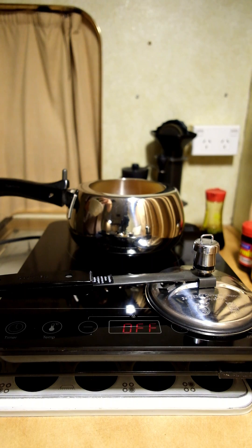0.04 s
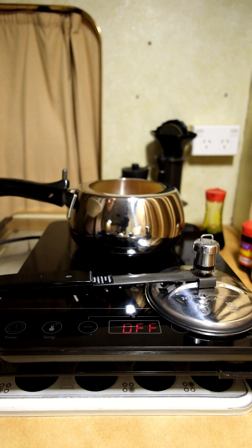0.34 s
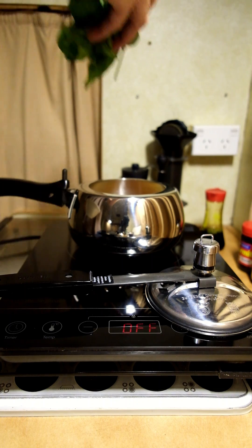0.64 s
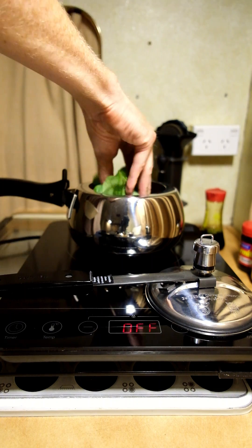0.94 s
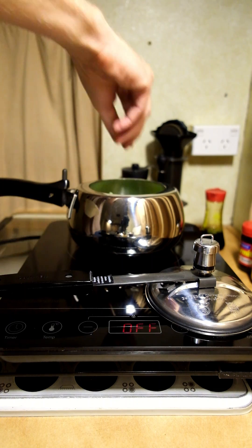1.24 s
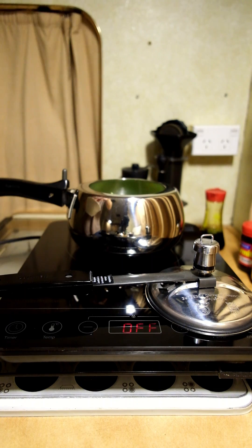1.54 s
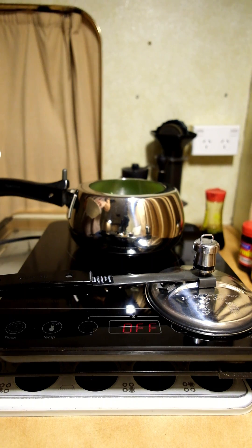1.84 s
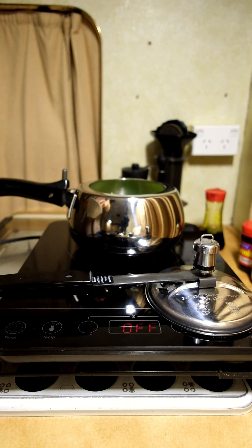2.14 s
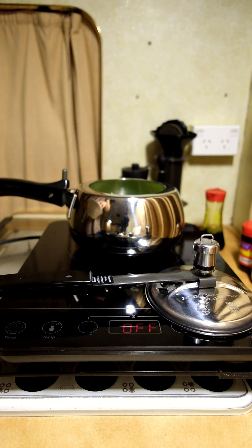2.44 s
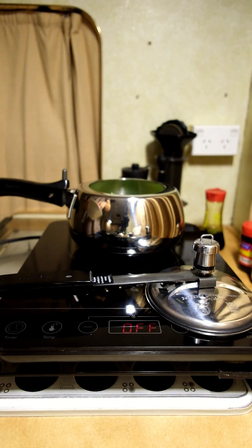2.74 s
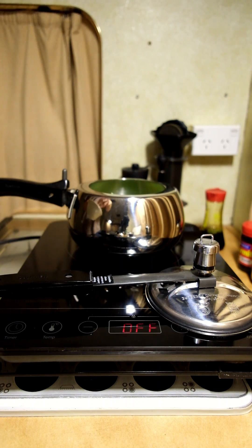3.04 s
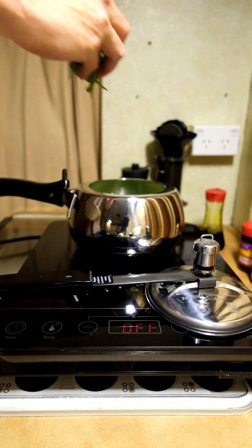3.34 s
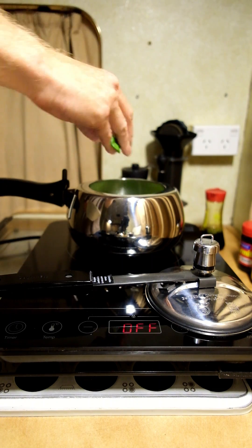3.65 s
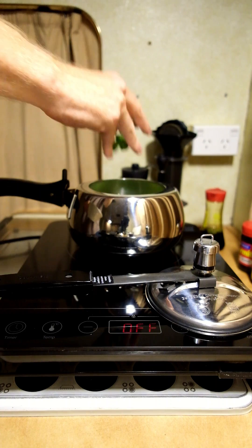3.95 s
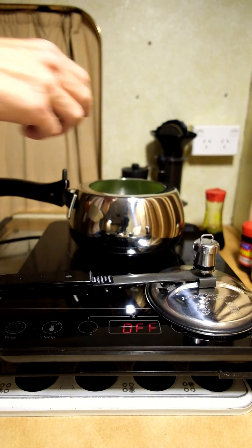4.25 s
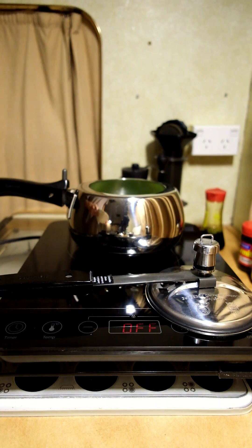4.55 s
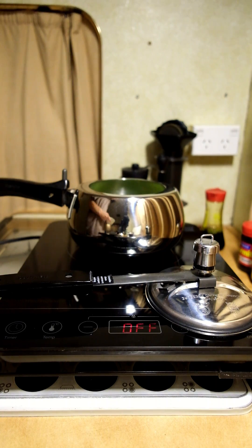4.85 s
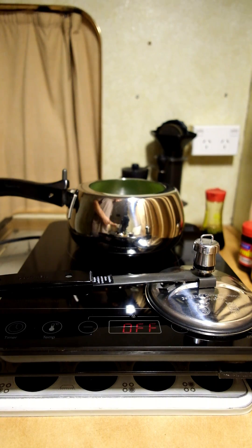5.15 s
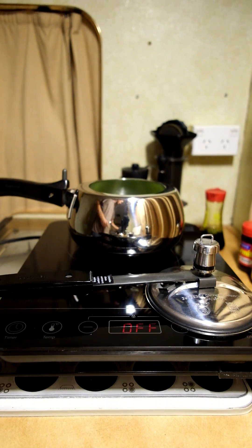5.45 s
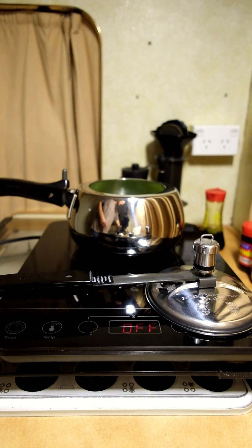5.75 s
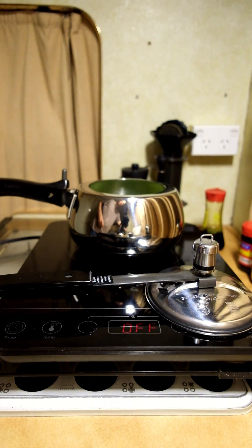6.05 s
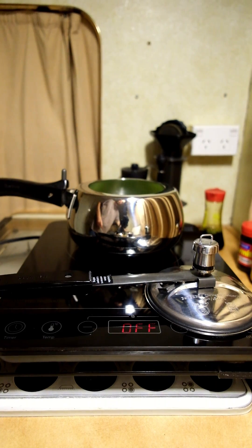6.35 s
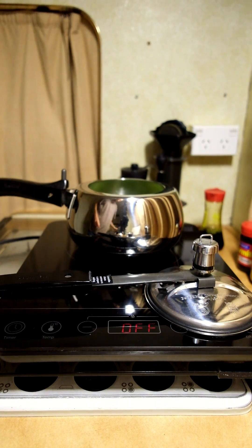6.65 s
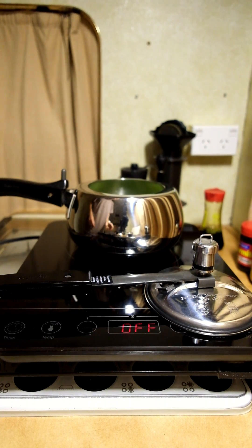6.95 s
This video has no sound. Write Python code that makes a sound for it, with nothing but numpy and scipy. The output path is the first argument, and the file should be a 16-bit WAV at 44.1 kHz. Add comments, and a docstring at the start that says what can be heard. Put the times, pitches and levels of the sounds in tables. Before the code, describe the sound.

Faint room tone of a small kitchen runs throughout. After a few tiny ticks, leaves rustle and a handful drops into a steel pot at about 1 second, with soft, hollow slaps. From 1.6 to 3 seconds more leaves are gathered by hand: quiet rustling and crinkling, tiny wet squeaks and crisp snapping stalks. A second handful lands at about 3.5 seconds, a few more snaps follow, and a smaller one lands just after 4 seconds. A faint tap on steel comes at 4.9 seconds, then a soft floor bump. At 5.9 seconds something heavy knocks the worktop beside the microphone, by far the loudest sound, then clatters and judders along it, stopping with a short low groan at about 6.3 seconds. A steel lid rings on faintly, and two soft floor bumps come near 6.7 and 6.9 seconds.

```python
"""Spinach is picked up by the handful and dropped into a steel pot in a small kitchen. Leaves rustle
and squeak as they rub, stalks snap, and each landing stirs the hollow air of the pot. Then something
heavy, perhaps a board, is knocked and shoved in stick-slip along the worktop beside the microphone,
and the steel lid lying on the hob rings on. Behind: a tap on steel, floor bumps, faint room tone."""
import sys
import numpy as np
from scipy import signal
from scipy.fft import rfft, irfft
from scipy.io import wavfile

SR = 44100
rng = np.random.default_rng(int(sys.argv[2]) if len(sys.argv) > 2 else 0)


def generate_wav(sig):
    """Save sig (samples, or channels by samples) to the path in sys.argv[1] as 16-bit PCM at SR."""
    pcm = np.round(np.clip(np.atleast_2d(sig).T, -1, 1) * 32767).astype(np.int16)
    wavfile.write(sys.argv[1], SR, pcm)


N = 308700
T = np.arange(N) / SR

# Spectra. Each row: frequency in Hz, relative density in dB.
ROOM_SPECTRUM = [(13, -43), (22, -10), (64, -4.5), (110, -8.5), (175, -18.5), (240, -10), (342, -19.5),
                 (426, -15), (475, -19.5), (698, -19), (869, -20.5), (1350, -19.5), (1600, -23.5),
                 (2600, -27), (4630, -31.5), (15500, -39.5)]
CRACK_SPECTRUM = [(80, -21), (200, -1), (330, 8.5), (500, -1), (850, 0.5), (1200, 7), (1550, 0),
                  (2000, -7.5), (3600, -5.5), (5000, -10), (7800, -16.5), (9400, -20.5), (11200, -42),
                  (15000, -37.5)]
JUDDER_SPECTRUM = [(29, -55), (50, -49.5), (134, 1.5), (216, -5.5), (339, 4), (381, -7.5), (670, -4),
                   (883, -4), (977, -34.5), (1270, -20), (1600, -39.5), (2080, -71)]
GRIT_SPECTRUM = [(590, -44), (1000, -6.5), (1260, 0), (1490, -5.5), (1820, -3.5), (1970, -9.5),
                 (2450, -8.5), (3530, -13.5), (9250, -27.5), (14600, -55), (15500, -83)]
LANDING_SPECTRUM = [(180, -26), (300, -14), (685, -4.5), (821, -20.5), (1220, -1.5), (1620, -11.5),
                    (1910, -5.5), (7750, -12), (15500, -20)]
TEAR_SPECTRUM = [(400, -18), (1500, 1.5), (3000, 3.5), (5500, 9), (9000, 2), (15000, -12.5)]
RUSTLE_SPECTRUM = [(240, -40), (400, -6), (796, -21), (928, -9.5), (1660, -24.5), (1820, 3.5), (2190, -7),
                   (2550, 4.5), (3250, -1.5), (5150, 6), (9000, 0.5), (15500, -14)]
# Stereo width of the room tone. Each row: frequency in Hz, side over mid in dB.
ROOM_SIDE_GAIN = [(50, -0.5), (130, 0), (300, -4.5), (1300, -3), (3000, 0.5), (15000, -0.5)]

# Resonances. Each row: frequency in Hz, relative level in dB, t60 in seconds.
FLOOR_MODES = [(118, 3.4, 0.16), (66, 4.7, 0.051)]
STEEL_MODES = [(806, -3.5, 0.11), (1786, 0, 0.049), (3050, 7, 0.017), (4270, -5, 0.02), (4620, -7, 0.035),
               (6255, -3.5, 0.043), (8030, -9, .025)]
WORKTOP_MODES = [(138.2, -29, 0.4), (176.5, -6.5, 0.031), (221.3, 1, 0.038), (322, -25.5, 0.08),
                 (410, -34.5, 0.021), (495, -25, 0.078), (530, -22, 0.13), (760, -19.5, 0.055),
                 (770, -21, 0.081), (895, -17, 0.092), (1210, -10.5, .022), (1446, -22.5, 0.06),
                 (1690, -21.5, 0.06), (2440, -24, 0.038), (2990, -22, 0.03), (5790, -15, 0.076)]
BOARD_MODES = [(344, 5, 0.04), (396, -1, 0.045), (586, -4.5, 0.16), (666, -4, 0.13), (760, -14.5, 0.2),
               (920, -13, 0.063), (1200, -8, 0.044), (1414, -17.5, 0.039)]
LID_MODES = [(134.6, 2, 0.99), (339, -6.5, 1), (504, -4.5, 0.6), (807, -5.5, 0.96), (1800, -3, 0.85)]
POT_AIR_MODES = [(571, -1.5, 0.11), (675, -4, 0.083), (1205, 6, 0.07), (1250, -1, 0.11), (1430, -19, 0.018),
                 (1960, -17, 0.016), (2500, 1, 0.011), (3910, 1, 0.022)]

# Small knocks. Each row: start in seconds, level in dB.
FLOOR_BUMPS = [(5.101, -48.5), (6.703, -51.5), (6.938, -43.5)]
STEEL_TAPS = [(4.9055, -44.5), (4.9205, -57)]
# Each row: start in seconds, thud level in dB, contact time in ms, crack trim in dB, board clack in dB.
WORKTOP_BLOWS = [(0.101, -60, .5, 19, -75), (5.899, -0.5, 0.31, -1, -36), (5.903, -14.5, 0.74, -3.5, -38.5),
                 (5.9676, -16, 0.7, -2.5, -50), (5.995, -20.5, 1.1, -3, -54), (6.044, -15, 0.66, -13, -19),
                 (6.054, -21, 0.57, -8, -27), (6.084, -14.5, 0.55, -7, -47), (6.107, -18, 0.6, -19, -48),
                 (6.13, -23, 0.7, -12, -39), (6.169, -31.5, .4, 8, -31), (6.236, -33, 0.81, -10, -53),
                 (6.934, -64, 1.3, 18, -80)]
# A nudge, then the push. Each row: start in seconds, length in seconds, judder in dB, grit in dB.
WORKTOP_SHOVES = [(5.941, 0.16, -34, -41), (6.069, 0.19, -31, -37.5)]
# Handfuls sliding into the pot. Each row: thickest moment in seconds, brush in dB, pot air in dB,
# build-up t60 in seconds, settling t60 in seconds.
HANDFUL_LANDINGS = [(1.011, -45.5, -56, 0.46, 0.38), (3.556, -51, -52, 0.14, 0.2),
                    (4.08, -56, -61, 0.045, 0.16)]
# Each row: start in seconds, smack in dB, pot air in dB, pot pitch in Hz (moves with hand and heap).
LEAF_SLAPS = [(0.934, -47, -41, 1484), (1, -41, -41, 1260), (1.03, -39.5, -41.5, 1150),
              (1.052, -51, -45, 1220), (1.094, -47, -46.5, 1254), (3.54, -43, -42, 1240),
              (3.547, -42, -50, 1155), (3.565, -41.5, -40, 1223), (3.573, -44, -42.5, 1205),
              (4.064, -44.5, -42.5, 1197), (4.081, -52, -44.5, 1178)]
# Stalks snapping, leaves flicking. Each row: start in seconds, level in dB, tick pitch in Hz.
STALK_SNAPS = [(0.167, -49, 3080), (0.267, -47, 5000), (1.031, -32, 6900), (1.623, -38.5, 4500),
               (1.867, -35, 6960), (1.889, -35, 6960), (1.9315, -27, 3580), (2.108, -42.5, 4670),
               (2.167, -48, 4000), (2.261, -42, 6010), (2.372, -57, 2600), (2.512, -34, 2300),
               (2.5418, -29, 6000), (2.636, -50, 4000), (2.71, -40, 4260), (2.738, -43, 4960),
               (2.8436, -25, 6060), (2.88, -35, 4500), (2.9132, -23, 4400), (2.941, -33.5, 4000),
               (3.377, -43.5, 4840), (3.454, -35.5, 4200), (3.7275, -28, 7200), (3.738, -50, 6050),
               (3.763, -36, 8500), (3.84, -42, 7600), (3.886, -38, 6600), (3.903, -39.5, 7600),
               (4.064, -58, 4370)]
# Each row: start in seconds, level in dB, starting pitch in Hz, t60 in seconds.
LEAF_SQUEAKS = [(0.103, -62, 5640, 0.021), (0.905, -48, 2390, 0.037), (1.621, -46.5, 2900, 0.031),
                (1.655, -52, 5260, 0.13), (1.772, -34.5, 5620, 0.018), (1.839, -39, 3000, 0.018),
                (1.9318, -27, 2780, 0.0095), (1.948, -40.5, 2510, 0.036), (1.993, -50, 2450, 0.084),
                (2.264, -46.5, 5560, .03), (2.371, -41, 2540, 0.014), (2.395, -47, 2210, 0.022),
                (2.51, -35.5, 2230, 0.02), (2.595, -42, 2620, 0.044), (3.535, -44.5, 4130, 0.033),
                (3.7265, -38, 2180, 0.015)]
# The hand closes and eases off. Each row: tightest moment in seconds, rustle in dB, crinkle in dB,
# build-up t60 in seconds, release t60 in seconds.
HAND_GRIPS = [(0.11, -102, -82, 1, 5.1), (0.92, -56.5, -63, 0.09, 0.33), (1.645, -58, -87, 0.31, 0.27),
              (1.884, -52, -52, 0.8, 0.76), (2.28, -64.5, -54.5, 0.24, 0.36),
              (2.565, -54.5, -55, 0.44, 0.54), (2.74, -69, -62.5, 0.56, 0.43),
              (2.892, -46.5, -74, 0.37, 0.16), (2.942, -46.5, -73, 0.19, 0.038),
              (3.449, -46.5, -79, 0.077, 0.12), (3.91, -56, -68, 0.18, 0.11)]


def undb(db):
    """Decibels to gain."""
    return 10 ** (np.asarray(db) / 20)


def unit_rms(x):
    """Scale to rms 1."""
    return x / np.sqrt(np.mean(x ** 2))


def unit_peak(x):
    """Scale to peak 1."""
    return x / np.abs(x).max()


def add(track, start_s, sound):
    """Mix a sound into a track."""
    i = int(start_s * SR)
    track[i:i + len(sound)] += sound[:N - i]


def through(x, response):
    """Convolve, keeping the length."""
    return signal.fftconvolve(x, response)[:len(x)]


def band(x, hz, kind, order=2):
    """Butterworth low-pass or high-pass."""
    return signal.sosfilt(signal.butter(order, hz, kind, fs=SR, output="sos"), x)


def colour(x, spectrum, size=8192):
    """Minimum-phase filter of unit power through (Hz, dB) points."""
    hz, db = np.transpose(spectrum)
    bins_hz = np.maximum(np.fft.rfftfreq(size, 1 / SR), 1)
    cepstrum = irfft(np.log(undb(np.interp(np.log(bins_hz), np.log(hz), db))))
    cepstrum[1:size // 2] *= 2
    cepstrum[size // 2 + 1:] = 0
    response = irfft(np.exp(rfft(cepstrum)))
    return through(x, response / np.linalg.norm(response))


def fade(t60_s):
    """One second of exponential decay."""
    return undb(-60 * T[:SR] / t60_s)


def swell(peak_s, rise_t60_s, fall_t60_s):
    """Exponential rise to 1, then exponential fall."""
    return undb(-60 * np.maximum((peak_s - T) / rise_t60_s, (T - peak_s) / fall_t60_s))


def stroke(start_s, length_s, attack_s, release_t60_s):
    """Linear attack, hold, exponential release."""
    release = undb(-60 * np.maximum(T - start_s - length_s, 0) / release_t60_s)
    return np.clip((T - start_s) / attack_s, 0, 1) * release


def ring(modes):
    """Impulse response of damped modes."""
    return sum(undb(db) * fade(t60_s) * np.sin(2 * np.pi * hz * T[:SR]) for hz, db, t60_s in modes)


def walk(rate_hz):
    """Random wander, spread near 1."""
    steps = rng.standard_normal(N // 50)
    return np.interp(T * rate_hz, np.arange(len(steps)), steps)


def grains(per_s, spread_db=0.0):
    """Tiny random slips of unequal size; rms 1."""
    size = undb(spread_db * np.minimum(rng.exponential(size=N), 4))
    return unit_rms((rng.random(N) < per_s / SR) * size * rng.standard_normal(N))


def place(x, left_lag_ms, wet_db, t60_s, wet_bass_db=0.0, pan_left_db=0.0):
    """Stereo direct sound plus wall echoes, which the channels share in the bass only."""
    bins_hz, crossover_hz = np.fft.rfftfreq(N, 1 / SR), 604
    echo_spectrum = [(300, wet_bass_db), (1300, wet_bass_db / 2), (4000, 0.022)]
    shared = band(rng.standard_normal(SR), crossover_hz, "low", order=1)
    channels = []
    for side in (1, -1):
        delay_s = side * left_lag_ms / 2000
        direct = irfft(rfft(x) * np.exp(-2j * np.pi * bins_hz * delay_s), N)
        echoes = shared + band(rng.standard_normal(SR), crossover_hz, "high", order=1)
        walls = colour(echoes, echo_spectrum) * fade(t60_s) * (T[:SR] > 0.002)
        wet = undb(wet_db) * through(x, walls / np.linalg.norm(walls))
        channels.append(undb(side * pan_left_db / 2) * (direct + wet))
    return np.array(channels)


def room_tone():
    """Faint rumble and hiss, wavering slightly."""
    mid = colour(rng.standard_normal(N), ROOM_SPECTRUM) * undb(0.5 * walk(rate_hz=0.38))
    hz, db = np.transpose(ROOM_SIDE_GAIN)
    width = undb(np.interp(np.fft.rfftfreq(N, 1 / SR), hz, db))
    side = irfft(rfft(colour(rng.standard_normal(N), ROOM_SPECTRUM)) * width, N)
    return undb(-60.5) * np.array([mid + side, mid - side])


def small_knocks():
    """Light taps ring the steel; soft bumps ring the floorboards."""
    out, soft_onset = np.zeros(N), 1 - fade(0.011)
    for events, modes in ((STEEL_TAPS, STEEL_MODES), (FLOOR_BUMPS, FLOOR_MODES)):
        for start_s, db in events:
            add(out, start_s, undb(db) * ring(modes) * soft_onset)
    return place(out, left_lag_ms=-0.042, wet_db=-6.0, t60_s=0.13, wet_bass_db=-18)


def lid(shaking):
    """Each mode of lid and hob stores the shaking's energy and releases it slowly."""
    out = 0
    for hz, db, t60_s in LID_MODES:
        memory = fade(t60_s) ** 2
        energy = np.abs(through(shaking ** 2, memory / memory.sum()))
        out += undb(db) * np.sqrt(energy) * np.sin(2 * np.pi * hz * T)
    return out


def blows():
    """A force pulse thuds the worktop, duller for longer contact, with a crack and a board clack."""
    out, body, clack = np.zeros(N), ring(WORKTOP_MODES), ring(BOARD_MODES)
    for start_s, db, contact_ms, crack_trim_db, clack_db in WORKTOP_BLOWS:
        progress = 1000 * T[:SR] / contact_ms
        force = progress * np.exp(-6 * progress)
        thud = through(body, force / force.sum())
        burst = rng.standard_normal(SR) * (fade(0.017) + undb(-13.5) * fade(0.12))
        crack = undb(crack_trim_db - 5.5) * colour(burst, CRACK_SPECTRUM)
        add(out, start_s, undb(db) * (crack - thud) - undb(clack_db) * clack)
    return out


def groan():
    """As the push slows, the slips lock into a low, slightly rising tone."""
    start_s, length_s, base_hz, rise_hz_per_s = 6.215, 0.036, 160.6, 330
    glide_hz = base_hz + rise_hz_per_s * np.clip(T - start_s, 0, length_s)
    pitch_hz = glide_hz * (1 + 0.03 * walk(rate_hz=110))
    envelope = stroke(start_s, length_s, attack_s=0.029, release_t60_s=0.2)
    return undb(-25) * envelope * np.sin(2 * np.pi * np.cumsum(pitch_hz) / SR)


def shove(low_cut_hz):
    """The heavy thing judders in uneven slips over hissing grit and groans to a stop."""
    judder_gain, grit_gain = 0, 0
    for start_s, length_s, judder_db, grit_db in WORKTOP_SHOVES:
        speed = stroke(start_s, length_s, attack_s=0.037, release_t60_s=0.16)
        slid_s = np.clip(T - start_s, 0, length_s)
        judder_gain += speed * undb(judder_db - 0.5 * slid_s)  # holds steady while sliding
        grit_gain += speed * undb(grit_db)
    judder = unit_rms(colour(grains(per_s=2200), JUDDER_SPECTRUM)) * judder_gain
    judder *= undb(2.0 * walk(rate_hz=55) + 1.0)
    grit = unit_rms(colour(grains(per_s=11000), GRIT_SPECTRUM)) * grit_gain
    return band(judder, low_cut_hz, "high") + groan() + grit


def worktop():
    """The worktop radiates blows and scraping with little deep bass; its shaking rings the lid."""
    low_cut_hz = 72
    knocks = band(blows(), low_cut_hz, "high", order=4)
    scrape = shove(low_cut_hz)
    ringing = undb(-23.0) * lid(undb(-7.5) * knocks + scrape)
    struck = place(knocks, left_lag_ms=0.1, wet_db=-3, t60_s=0.03, wet_bass_db=-14, pan_left_db=-0.5)
    slid = place(scrape, left_lag_ms=0.081, wet_db=2, t60_s=0.074, wet_bass_db=-10.5, pan_left_db=-1)
    return struck + ringing + slid


def slaps():
    """Leaves smack down on each other and ring the air in the pot."""
    out, open_pot_hz = np.zeros(N), 1218  # pitch with no hand in the way
    for start_s, smack_db, air_db, pot_hz in LEAF_SLAPS:
        smack = colour(rng.standard_normal(SR) * fade(0.055), LANDING_SPECTRUM)
        plop = ring(np.array(POT_AIR_MODES) * [pot_hz / open_pot_hz, 1, 1])
        add(out, start_s, undb(air_db) * unit_peak(plop) + undb(smack_db) * unit_peak(smack))
    return out


def landings():
    """Falling leaves brush the steel, slap down and stir the pot's air, which the heap damps."""
    brush_gain, air_gain = 0, 0
    for peak_s, brush_db, air_db, build_s, settle_s in HANDFUL_LANDINGS:
        falling = swell(peak_s, build_s, settle_s)
        brush_gain += undb(brush_db) * falling
        air_gain += undb(air_db) * falling
    brush = colour(grains(per_s=6000, spread_db=2.7), LANDING_SPECTRUM) * brush_gain
    leaves = brush + slaps()
    hollow = ring(POT_AIR_MODES)
    air = through(grains(per_s=2800) * air_gain, hollow / np.linalg.norm(hollow))
    return place(leaves + air, left_lag_ms=-0.034, wet_db=-4, t60_s=0.014,
                 wet_bass_db=1.5, pan_left_db=0.5)


def squeak(start_hz, t60_s):
    """Stick-slip tone that wobbles and climbs as the wet leaf speeds up."""
    t, rise, wobble, attack_s = T[:SR], 0.305, 0.054, 0.0014
    pitch_hz = start_hz * (1 + rise * np.minimum(t / t60_s, 1) + wobble * walk(rate_hz=550)[:SR])
    return np.minimum(t / attack_s, 1) * fade(t60_s) * np.sin(2 * np.pi * np.cumsum(pitch_hz) / SR)


def snaps_and_squeaks():
    """Stalks break with a pitched tick and a brief tear; wet leaves squeak on each other."""
    out, reference_hz = np.zeros(N), 4540  # lower snaps tear duller
    for start_s, db, tick_hz in STALK_SNAPS:
        spectrum = np.array(TEAR_SPECTRUM) * [np.sqrt(tick_hz / reference_hz), 1]
        tear = colour(rng.standard_normal(SR) * (fade(0.0042) + undb(-7.0) * fade(0.034)), spectrum)
        tick = ring([(tick_hz, -10, 0.004)])
        add(out, start_s, undb(db) * (unit_peak(tear) + tick))
    for start_s, db, start_hz, t60_s in LEAF_SQUEAKS:
        add(out, start_s, undb(db) * squeak(start_hz, t60_s))
    return place(out, left_lag_ms=-0.052, wet_db=-2.0, t60_s=0.087, pan_left_db=0.9)


def fold_clicks(count):
    """Leaf folds click at random times, each with its own pitch and size; rms 1."""
    centre_hz, spread_octaves, spread_db, t60_s = 2760, 0.5, 3, 0.0052
    out, t = np.zeros(N), T[:SR // 50]
    for start_s, (pitch, size) in zip(rng.random(count) * T[-1], rng.standard_normal((count, 2))):
        hz = centre_hz * 2 ** (spread_octaves * pitch)
        add(out, start_s, undb(spread_db * size - 60 * t / t60_s) * np.sin(2 * np.pi * hz * t))
    return unit_rms(out)


def handling():
    """Gripped leaves rub in dense little slips and crinkle along their folds."""
    rustle_gain, crinkle_gain = 0, 0
    for peak_s, rustle_db, crinkle_db, build_s, release_s in HAND_GRIPS:
        pressure = swell(peak_s, build_s, release_s)
        rustle_gain += undb(rustle_db) * pressure
        crinkle_gain += undb(crinkle_db) * pressure
    rustle = colour(grains(per_s=5500, spread_db=3.5), RUSTLE_SPECTRUM) * rustle_gain
    rustle *= undb(1.65 * walk(rate_hz=90))
    crinkle = fold_clicks(count=5000) * crinkle_gain
    return place(rustle + crinkle, left_lag_ms=-0.068, wet_db=-2.0, t60_s=0.056)


def scene():
    """Stereo sum of the kitchen."""
    return handling() + snaps_and_squeaks() + landings() + worktop() + small_knocks() + room_tone()


def record(dry):
    """The loudest blow overloads the microphone; the top is cut."""
    ceiling, top_hz = 0.95, 15800
    clipped = dry / (1 + (dry / ceiling) ** 8) ** (1 / 8)
    return signal.sosfilt(signal.ellip(8, 0.2, 70, top_hz, fs=SR, output="sos"), clipped)


dry = scene()
out = record(dry)
generate_wav(out)
```